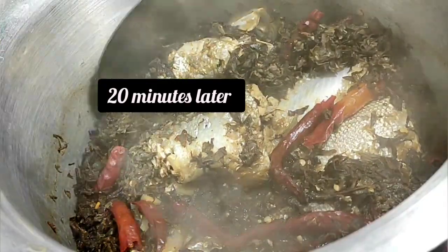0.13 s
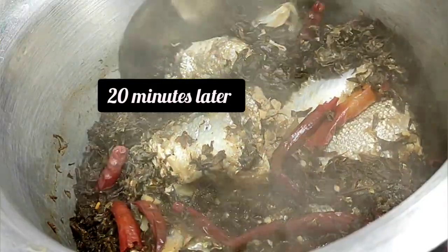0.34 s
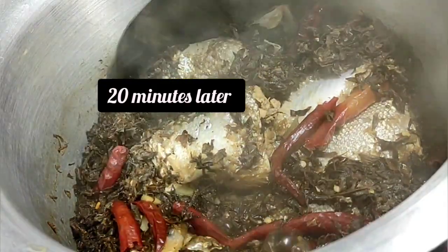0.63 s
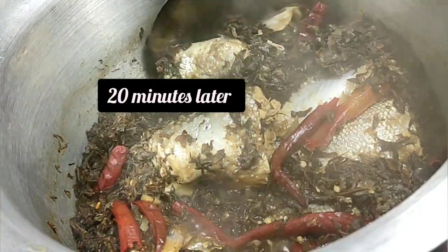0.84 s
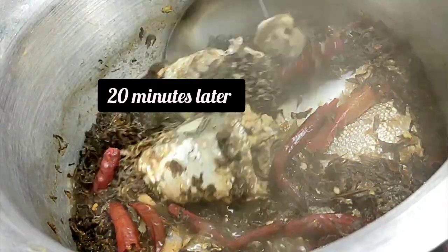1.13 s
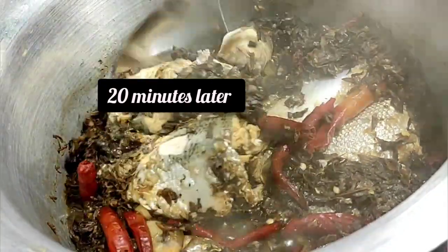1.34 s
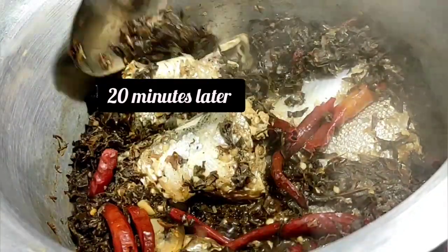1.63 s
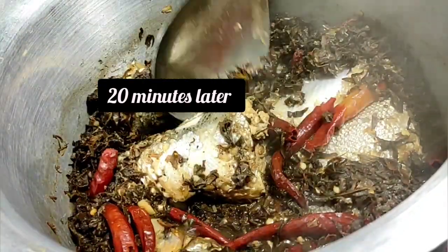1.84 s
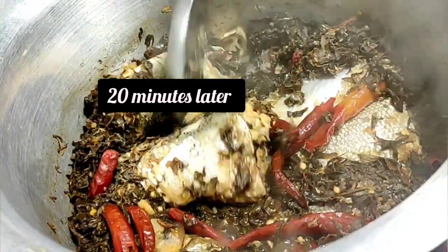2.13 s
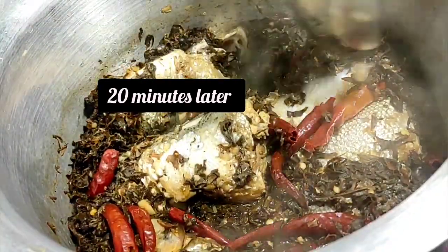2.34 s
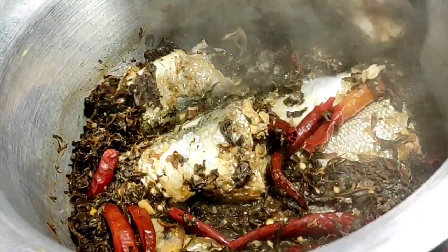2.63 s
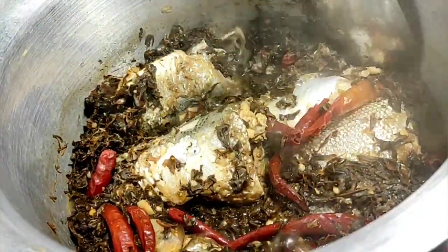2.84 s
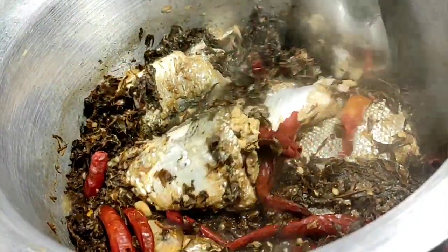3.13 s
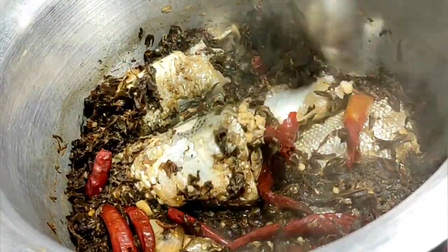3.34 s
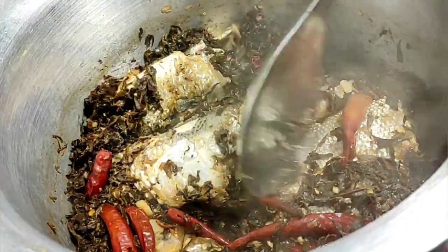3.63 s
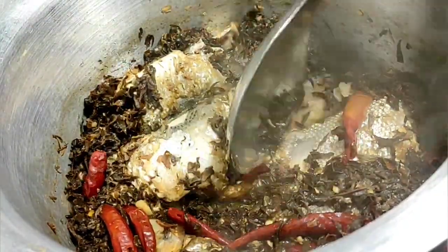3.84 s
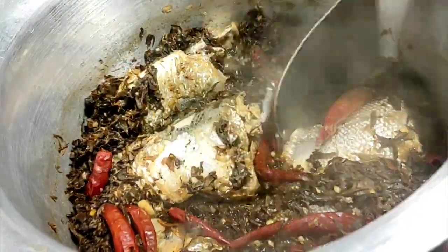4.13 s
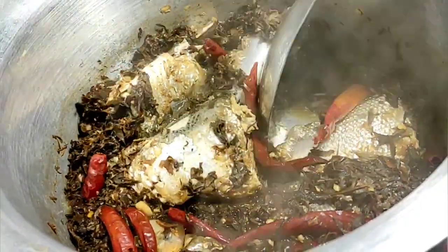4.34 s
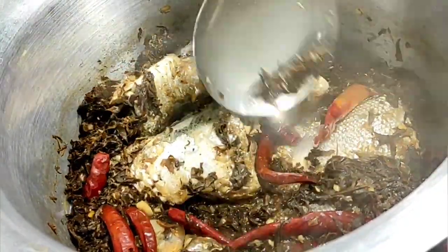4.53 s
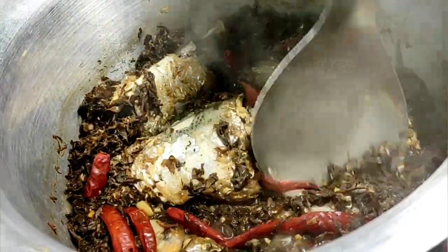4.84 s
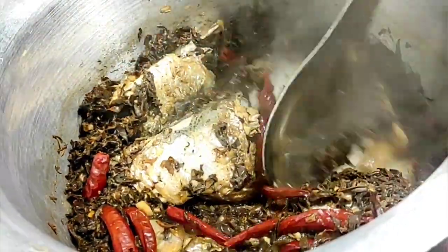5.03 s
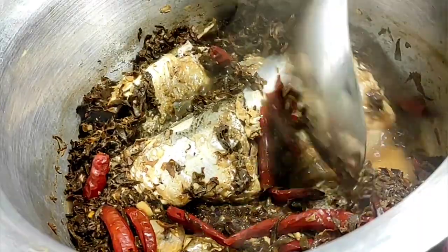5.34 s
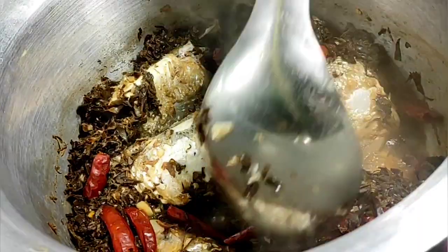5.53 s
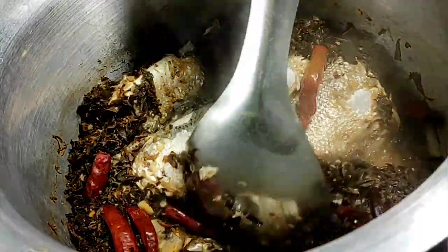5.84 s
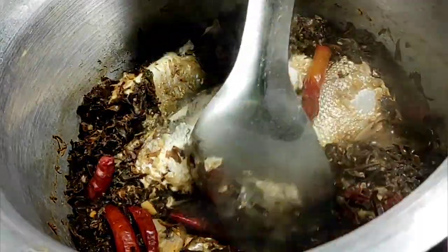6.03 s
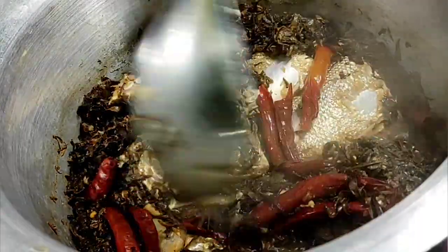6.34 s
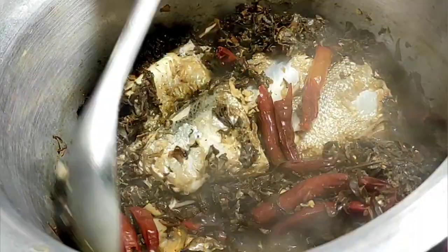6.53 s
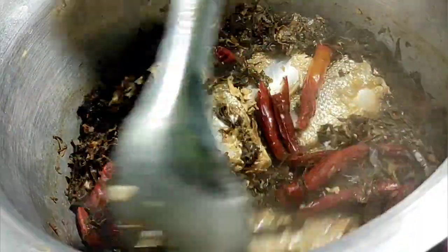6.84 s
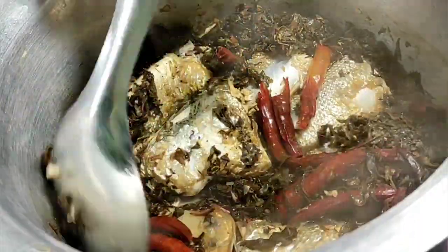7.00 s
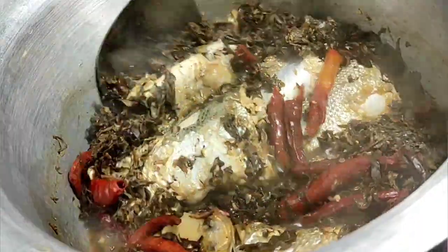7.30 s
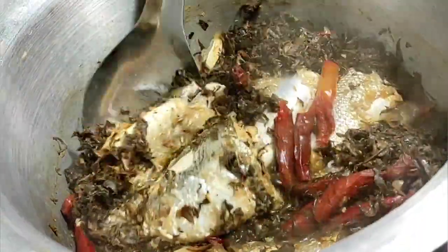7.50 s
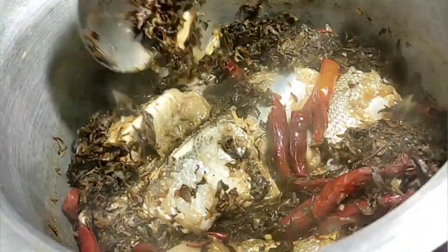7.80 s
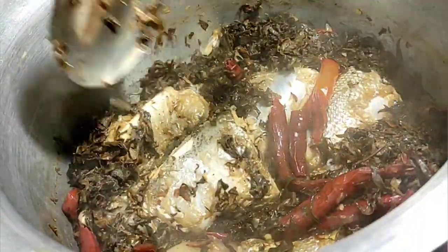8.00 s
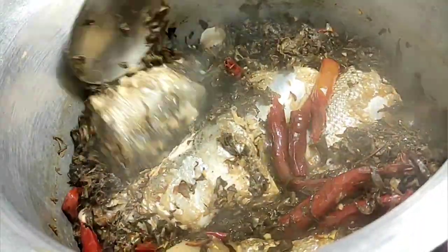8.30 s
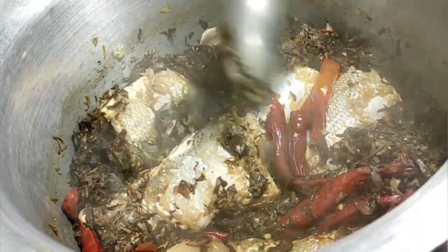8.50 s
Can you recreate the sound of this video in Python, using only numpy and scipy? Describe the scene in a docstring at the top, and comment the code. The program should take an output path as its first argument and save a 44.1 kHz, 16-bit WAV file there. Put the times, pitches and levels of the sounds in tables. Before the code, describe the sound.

A low bubbling wash and grainy sizzle run throughout, gently rising and falling, dotted with sharp spits and soft liquid plops. Over it a metal ladle works in a pot: short dull rubs, rasping scrapes and occasional metallic blows whose ring is quickly damped by food. The two clearest clangs ring for about half a second. Close stereo microphone, short hard kitchen reflections.

```python
"""A steel ladle strikes the wall of a thin metal pot, scrapes along it and turns as it rings.
Blows and scrapes excite sums of dying modes of the ladle and the wall, with noise for impact and friction.
Behind them a thick stew simmers as resonant noise, sizzles in bursts of tiny droplets and spits fat.
Two microphone ports, each with its own treble resonance, listen from close by in a small kitchen."""
import sys
import numpy as np
from scipy import signal
from scipy.fft import rfft, irfft
from scipy.io import wavfile
from scipy.ndimage import uniform_filter1d

SR = 44100
rng = np.random.default_rng(int(sys.argv[2]) if len(sys.argv) > 2 else 0)


def to_wav(sig):
    """Store sig (one row per channel, or 1-D mono) as 16-bit WAV at the path in sys.argv[1].

    Samples outside -1..1 are clipped; the rate is SR.
    """
    pcm = np.clip(np.atleast_2d(sig), -1, 1) * 32767
    pcm = np.round(pcm).astype(np.int16)
    wavfile.write(sys.argv[1], SR, pcm.T)  # frames by channels


N = 381906


def gain_of(db):
    """Level to amplitude: 20 dB is a factor of ten."""
    return 10 ** (np.asarray(db) / 20)


def evened(x):
    """Normalization to unit root-mean-square."""
    return x / np.sqrt(np.mean(x ** 2) + 1e-20)


def read(points, hz, order=1):
    """Interpolation of a table column along logarithmic frequency."""
    table = np.transpose(points)
    return np.interp(np.log(hz + 1), np.log(table[0] + 1), table[order])


def curve(rows, order):
    """Amplitude envelope: a dB column interpolated over time."""
    table = np.transpose(rows)
    return gain_of(np.interp(np.arange(N) / SR, table[0], table[order]))


def add(mix, s, sound):
    """Superposition: the sound joins the mix at time s."""
    part = mix[:, round(s * SR):][:, :sound.shape[1]]
    part += sound[:, :part.shape[1]]


# Decay of the room: (frequency [Hz], t60 [s])
KITCHEN_DECAY = [(100, 0.16), (500, 0.635), (2000, 0.387), (5000, 0.447), (10000, 0.12)]


def kitchen(x):
    """Reverberation: sparse echoes of random sign, each band decaying exponentially at its own rate."""
    taps = np.zeros((2, SR // 2))
    grid = np.arange(200, SR // 2 - 20, 20)
    at = grid + rng.integers(0, 20, (2, len(grid)))  # one echo in every 20 samples
    np.put_along_axis(taps, at, rng.choice([-1., 1.], at.shape), 1)
    hz, t, bands = signal.stft(taps, SR, nperseg=256)
    decay = gain_of(-60 * t / read(KITCHEN_DECAY, hz)[:, None])
    tail = signal.istft(bands * decay, SR, nperseg=256)[1]
    return signal.fftconvolve(x, tail / np.linalg.norm(tail[0]), axes=1)[:, :N]


# Relative treble colour of the ports: (frequency [Hz], left [dB], right [dB])
PORT_COLOUR = [(292, -25, -26), (1188, 0, 2), (1647, -15.5, -9), (2403, -18, -8), (3300, -13, -7.5),
               (4400, -10, -4), (5000, -13, -3.5), (6000, -11.5, -1.5), (6500, -10, 1), (7000, -7, 6.5),
               (7600, -4.5, 2), (8600, -1, -4), (9100, -7, -10), (9400, -14, -15), (9900, -24.5, -20.5),
               (14800, -29.5, -29), (15900, -37.5, -66.5)]


def ports(x):
    """Minimum-phase resonance: causal treble colour of each port; white noise keeps its level."""
    hz = abs(np.fft.fftfreq(2048, 1 / SR))
    colour_db = [read(PORT_COLOUR, hz, order=1), read(PORT_COLOUR, hz, order=2)]
    log_gain = np.log(gain_of(colour_db))
    taps = np.fft.ifft(np.exp(np.conj(signal.hilbert(log_gain)))).real[:, :1024]
    taps /= np.sqrt(np.sum(taps ** 2) / 2)
    return signal.oaconvolve(x, taps, axes=1)[:, :x.shape[1]]


# Where the pot wall radiates little: (lower edge [Hz], upper edge [Hz])
QUIET_BAND = [3200, 4200]


def walled(x):
    """Radiation efficiency: the band in which the wall is quiet is dimmed."""
    band = signal.butter(1, QUIET_BAND, "band", fs=SR, output="sos")
    return x - 0.675 * signal.sosfilt(band, x)


# Resonances of the air in the pot: (frequency [Hz], width [Hz], level of the added lift [dB])
AIR_RESONANCES = [(339.38, 19.3, 12.5), (455, 17.62, 27.5), (577.1, 29.8, 19)]
# Likeness of the two channels: (frequency [Hz], correlation [0-1])
LIKENESS = [(60, 0.63), (130, 1), (290, 0.925), (640, 0.647), (1400, 0.25), (3000, 0.01)]
# Balance of the channels: (frequency [Hz], left minus right [dB])
BALANCE = [(60, 2), (300, 2.5), (800, -1.5), (2000, 0.5)]


def stew(spectrum, patchy_db, flicker_db):
    """Cavity resonance: a low noise wash lifted where the air in the pot resonates; the bass is steadier."""
    frames, hz = N // 256 + 5, np.fft.rfftfreq(1024, 1 / SR)[:140]
    a, b, c, d, patches = rng.standard_normal((frames, len(hz), 5)).T
    flicker = evened(uniform_filter1d(patches[0], 3))  # all bands together
    patches = evened(uniform_filter1d(uniform_filter1d(patches, 5, 0), 5, 1))
    same = np.clip(read(LIKENESS, hz), -1, 1)[:, None]
    left = a + 1j * b
    right = same * left + np.sqrt(1 - same ** 2) * (c + 1j * d)
    bands = np.array([left, right])
    lift = 1 + sum(gain_of(db) / (1 + (2 * (hz - f) / width) ** 2) for f, width, db in AIR_RESONANCES)
    colour_db = np.outer([.5, -.5], read(BALANCE, hz)) + read(spectrum, hz)
    bands *= gain_of(colour_db)[:, :, None] * lift[:, None]
    unrest = (hz / (hz + 250))[:, None]
    bands *= gain_of((patchy_db * patches + flicker_db * flicker) * unrest)
    bands = np.pad(bands, ((0, 0), (0, 513 - len(hz)), (0, 0)))
    return evened(signal.istft(bands, nperseg=1024, noverlap=768)[1][:, :N])


# How hard the pot boils: (time [s], simmer level [dB], sizzle level [dB])
BOIL = [(0.0, -47.5, -46), (0.67, -47, -50.5), (0.96, -49, -48), (1.64, -48.5, -50), (2.99, -46.5, -49),
        (3.42, -47.5, -46.5), (3.81, -48.5, -50.5), (4.17, -45, -44), (4.53, -49.5, -50.5),
        (5.11, -48.5, -46), (5.52, -51.5, -50.5), (6.12, -48, -49), (6.42, -51.5, -51), (7.48, -45, -46.5),
        (7.79, -49, -51), (8.22, -50.5, -47.5), (8.44, -49, -48), (8.66, -51, -49.5)]
# Simmer before the air resonances: (frequency [Hz], relative density [dB per Hz])
SIMMER_SPECTRUM = [(15, -52), (25, -23.5), (64, -50), (87, -4.5), (252, 0.5), (294, -14), (331, -9),
                   (386, -15), (567, -10.5), (728, -4), (1800, -15), (2500, -14), (3250, -44), (5500, -120)]


def simmer():
    """Random superposition: many bursting bubbles merge into a low wash that follows the boil."""
    return curve(BOIL, order=1) * stew(SIMMER_SPECTRUM, patchy_db=1.83, flicker_db=3.5)


def fizz(per_s, spread_db, clump_db, hiss_db):
    """Shot noise: tiny droplets burst in clumps, each a few cycles long, over a smooth hiss."""
    slow = uniform_filter1d(uniform_filter1d(rng.standard_normal(N), 300), 300)
    clumps = gain_of(clump_db * evened(slow))
    size = gain_of(spread_db * np.minimum(rng.exponential(1, N), 5)) * (rng.random(N) < per_s / SR)
    kind, t, out = rng.integers(0, 10, N), np.arange(256) / SR, np.zeros((2, N))
    for k, (pitch, left, right) in enumerate(rng.random((10, 3))):
        hz = 1500 * 7.5 ** ((k + pitch) / 10)
        phase = np.array([[left], [right]])  # in cycles
        shape = np.exp(-t * hz / 3.5) * np.sin(2 * np.pi * (hz * t + phase))
        bursts = np.float32(size * (kind == k))[None]
        out += signal.oaconvolve(bursts, np.float32(shape * hz ** .5), axes=1)[:, :N]
    hiss = gain_of(hiss_db) * rng.standard_normal((2, N))
    return evened(ports(clumps * (evened(out) + hiss)))


def sizzle():
    """Random impulse excitation: droplets burst on hot metal at a level that follows the boil."""
    return curve(BOIL, order=2) * fizz(per_s=1500, spread_db=2.0, clump_db=2.0, hiss_db=2.5)


# Single spits, plops and ticks at set times, loud and soft:
# (time [s], relative spit level [dB], plop of the broth [dB])
TIMED_SPITS = [(0.2315, -30, -47), (0.3061, -29, -51), (0.3702, -32, -55), (0.5687, -32.5, -52.5),
               (0.8355, -31, -51.5), (0.922, -37, -57.5), (0.9477, -33.5, -56), (1.144, -31, -46),
               (1.1862, -45, -41), (1.222, -34.5, -46.5), (1.289, -43, -53), (1.305, -35, -55.5),
               (1.321, -39, -50.5), (1.3814, -38, -58), (1.457, -47.5, -59.5), (1.5542, -27.5, -40),
               (1.5884, -31.5, -54.5), (1.6456, -33, -38.5), (1.8139, -32, -50.5), (1.8932, -34, -51.5),
               (2.018, -41.5, -31.5), (2.0633, -29.5, -51), (2.1262, -29.5, -43), (2.2893, -42, -55.5),
               (2.5646, -26.5, -39.5), (2.6042, -30.5, -36.5), (2.7546, -32, -51), (2.9883, -35, -48),
               (3.1213, -32, -55), (3.3103, -37.5, -58), (3.548, -33, -32), (3.578, -37, -42.5),
               (3.6861, -36.5, -54.5), (3.888, -31.5, -41), (3.93, -33.5, -35.5), (4.2283, -24.5, -44.5),
               (4.9738, -53, -37), (4.9986, -37.5, -53.5), (5.0495, -36.5, -48), (5.1633, -34.5, -55),
               (5.1791, -50.5, -34.5), (5.397, -34, -56.5), (5.4615, -31.5, -40.5), (5.504, -36.5, -38),
               (5.607, -37, -44.5), (5.7571, -35.5, -44), (5.7658, -29.5, -49), (5.9255, -34, -56),
               (5.9809, -33.5, -54.5), (6.0622, -33.5, -59), (6.1046, -38, -56), (6.2568, -36.5, -58),
               (6.6269, -34, -55), (6.7696, -22.5, -51.5), (6.9761, -35.5, -52.5), (7.2245, -30, -57.5),
               (7.3663, -33, -55), (7.4665, -42, -55.5), (7.488, -29.5, -55.5), (7.533, -20, -41),
               (7.9719, -34, -38.5), (8.1739, -37, -54.5), (8.507, -43, -37.5), (8.56, -48.5, -38),
               (8.633, -49.5, -45)]
# Small spits at random times: number, least relative level, spread, plop against the spit
SMALL_SPITS, SMALL_DB, SMALL_SPREAD_DB, SMALL_PLOP_DB = 90, -47, 1.2, -13
RING_HZ, RING_SPREAD = 7424, 0.0256  # centre pitch of the faint high ring and its relative spread
PLOP_HZ, PLOP_S = 601, 0.0036  # median starting pitch and decay
TICK_S, PUFF_S, TAIL_S, TICK_SHARE, TAIL_SHARE = 0.00036, 0.00284, 0.024, .5, 0.18  # dying away


def spits():
    """Bubble acoustics: a tick and puff that ring faintly high in the ports, over a low plop that glides up."""
    out, low, t = np.zeros((2, N)), np.zeros((1, N)), np.arange(2000) / SR
    fall = np.exp(-t / PUFF_S) + TICK_SHARE * np.exp(-t / TICK_S) + TAIL_SHARE * np.exp(-t / TAIL_S)
    events = list(TIMED_SPITS)
    for when, size in rng.random((SMALL_SPITS, 2)):
        db = SMALL_DB - SMALL_SPREAD_DB * np.log(1 - size)
        events.append((when * N / SR, db, db + SMALL_PLOP_DB))
    for s, db, plop_db in events:
        (a, b), puff = rng.standard_normal(2), rng.standard_normal((2, 2000))
        ring_hz = RING_HZ * (1 + RING_SPREAD * a)
        high_ring = np.exp(-t / 0.004) * np.sin(2 * np.pi * ring_hz * t)
        add(out, s, gain_of(db) * fall * (0.4 * puff + 0.2 * high_ring))
        plop_hz = PLOP_HZ * np.exp(.25 * b)
        plop = np.sin(2 * np.pi * plop_hz * t * (1 + 10 * t)) * np.exp(-t / PLOP_S)
        add(low, s, gain_of(plop_db) * plop[None])
    return ports(out) + low


# Short-lived twins just under the strong ladle modes;
# each lags its partner by its own phase, so the pair beats while the twin lasts:
# (pitch [Hz], relative level [dB], t60 at full freedom [s], lobe angle before facing [rad],
#  lag behind the partner before any extra lag [rad])
TWIN_MODES = [(1204, 3.5, 0.205, -0.287, 0.71), (1900.1, 0.5, 0.125, -0.43, 2.864),
              (2366, -7, 0.193, 0.22, 0.39), (2715, -14, 0.233, 0.071, 0.7)]
SINK_DB_PER_S2, DIP_DB_PER_S, DIP_S = 216.5, 56.5, 0.193  # base rates at which food damps the ring; dip onset


def ring(pitches, modes, rough, free, hard_db, spot, facing, swing, lead=0, twin_db=None, favour=(), sink=1):
    """Modal superposition: dying modes each beam a lobe between the ports; lobes swing as the ladle turns."""
    hz, (db, t60, lobe) = np.array(pitches)[:, None], np.transpose(modes)[:, :, None]
    t = np.arange(round(SR * np.clip(.45 * free, .05, .5))) / SR
    db = db + hard_db * np.log2(np.maximum(hz, 1000) / 1500)
    db = db + 4.0 * np.cos(4.71 * np.log2(hz / 1500) + spot)  # the spot struck favours some modes
    twin_lag, *favour_db = favour or [0]
    db = db + np.pad(favour_db, (0, len(hz) - len(favour_db)))[:, None]
    contact = 1 + 0.2 * np.exp(-t / 0.0044)  # fast loss while steel still touches the wall
    upper = np.clip(hz / 1200 - 1, 0, 1.5)  # the upper modes sink more and more
    sinking_db = sink * SINK_DB_PER_S2 * t ** 2 * upper / max(free, .6) ** 3
    # a turning ladle dips into the food
    sinking_db = sinking_db + DIP_DB_PER_S * np.max(np.abs(swing)) * np.maximum(t - DIP_S, 0)
    gap, start, phase = rng.random((3, len(hz), 1))
    beat = np.cos(2 * np.pi * ((15 + 50 * gap) * t + start) + 2 * np.sin(2 * np.pi * 23 * t))
    throb = rough * beat * np.exp(2j * np.pi * gap)  # close neighbours
    fall = gain_of(db - 60 * t / (t60 * free) - sinking_db)
    waves = contact * fall * np.exp(2j * np.pi * (hz * t + phase)) * (1 + throb)
    turn = 1 - np.exp(-t / 0.18)  # the turn slows down
    angle = lobe + facing + np.reshape(swing, (-1, 1)) * turn
    rise = 1 - np.exp(-t * hz / 1.55)  # a mode takes a few cycles to speak
    right = waves * np.exp(1j * np.reshape(lead, (-1, 1)))
    out = (np.array([np.cos(angle) * waves.imag, np.sin(angle) * right.imag]) * rise).sum(1)
    if twin_db is not None:
        near = slice(1, len(TWIN_MODES) + 1)  # the partners of the twins
        low_hz, low_db, low_t60, low_lobe, lag = np.transpose(TWIN_MODES)[:, :, None]
        low_fall = gain_of(low_db + twin_db - 60 * t / (low_t60 * free))
        twins = low_fall * np.sin(2 * np.pi * (low_hz * t + phase[near]) - lag - twin_lag)
        beam = np.array([np.cos(low_lobe + facing), np.sin(low_lobe + facing)])
        out += (beam * twins * rise[near]).sum(1)
    return out * np.minimum((t[-1] - t) / .02, 1)


# Strokes of the ladle along the wall: (start [s], time to press on [s], time from start to lift [s],
#  relative rumble [dB], relative rasp [dB], groan pitch [Hz], groan level before the envelope [dB])
STROKES = [(0.205, 0.0205, 0.0272, -47.5, -40.5, 450, -57.5),
           (0.954, 0.0515, 0.1427, -41, -39.5, 342.8, -41), (1.992, 0.0164, 0.072, -59, -47.5, 450, -62),
           (2.975, 0.022, 0.046, -48, -39, 454, -62.5), (4.826, 0.0385, 0.098, -48, -50.5, 571, -52.5),
           (5.035, 0.03, 0.285, -54.5, -48.5, 567, -59.5), (6.176, 0.017, 0.0384, -48, -47.5, 450, -64),
           (6.702, 0.0152, 0.0803, -36, -33.5, 471, -42), (7.093, 0.0343, 0.0945, -60, -45.5, 344, -64)]
SAG_DB_PER_S, LIFT_DB_PER_S = 44, 270  # a stroke weakens while it lasts; then the ladle lifts away as well
GROAN_WIDTH = 0.083  # bandwidth against pitch
SLIPS_PER_S, SLIP_S, SLIP_DEPTH = 350, .0035, .3  # the edge sticks and slips unevenly


def strokes():
    """Stick-slip friction: slips break up the rumble and rasp gains; the wall groans low under each stroke."""
    out, groan, t = np.zeros((2, N)), np.zeros((1, N)), np.arange(SR // 2) / SR
    noises = rng.standard_normal((len(STROKES), SR // 2))
    for (s, press, length, *db, hz, groan_db), noise in zip(STROKES, noises):
        fall_db = SAG_DB_PER_S * np.maximum(t - press, 0) + LIFT_DB_PER_S * np.maximum(t - length, 0)
        shape = np.minimum(t / press, 1) ** 2 * gain_of(-fall_db)
        add(out, s, np.outer(gain_of(db), shape))
        edges = [hz * (1 - GROAN_WIDTH / 2), hz * (1 + GROAN_WIDTH / 2)]
        band = signal.butter(1, edges, "band", fs=SR, output="sos")
        add(groan, s, gain_of(groan_db) * shape * evened(signal.sosfilt(band, noise))[None])
    jolts = rng.exponential(1, N) * (rng.random(N) < SLIPS_PER_S / SR)
    slips = signal.lfilter([1], [1, -np.exp(-1 / (SLIP_S * SR))], jolts)
    rumble, rasp = out * evened(1 - SLIP_DEPTH + SLIP_DEPTH * evened(slips))
    return rumble, rasp, groan


# Rumble of dragged food before the air resonances: (frequency [Hz], relative density [dB per Hz])
RUB_SPECTRUM = [(60, -54.5), (200, -2), (350, 0.5), (600, -2.5), (1100, 10), (1600, 2.5), (2600, -9),
                (5000, -58.5)]


def scrapes():
    """Friction excitation: dragged food gives a lumpy rumble, a grainy rasp and the muffled ring of the steel."""
    rumble, rasp, groan = strokes()
    slips = rng.standard_normal(N) ** 2 * (rng.random(N) < 900 / SR)
    muffled = ring(LADLE_PITCHES + POT_PITCHES, LADLE_MODES + POT_MODES, rough=0.9, free=0.3,
                   hard_db=6.0, spot=0.5, facing=0.5, swing=0)
    steel = signal.oaconvolve(slips[None], muffled, axes=1)[:, :N]
    grit = fizz(per_s=2500, spread_db=3, clump_db=3, hiss_db=2) + .7 * evened(steel)
    wash = stew(RUB_SPECTRUM, patchy_db=3.0, flicker_db=3.0)
    return rumble * wash + groan + rasp * evened(walled(grit))


# Mode pitches of the ladle: (frequency [Hz])
LADLE_PITCHES = [455, 1215, 1916, 2396, 2808, 3298, 3910, 4490, 4657, 5505, 6457, 6589, 6928, 7068, 7250,
                 7490, 7698, 8425, 8520, 8630, 8742, 8974, 9870, 11230, 11660, 12600, 14100]
# Ring of the ladle at those pitches: (relative level [dB], t60 at full freedom [s], lobe angle before facing [rad])
LADLE_MODES = [(-14, 0.455, 0.714), (-4, 0.97, -0.39), (1.5, 0.695, -0.526), (-1.5, 0.64, 0.23),
               (-7, 0.81, 0.664), (-15, 0.44, -0.86), (-19.5, 0.51, 0.91), (-34, 0.21, .8),
               (-13.5, 0.23, 0.86), (-17, 0.143, 0.9), (-33.5, .35, 1), (-17.5, .2, .9),
               (-16.5, 0.197, 1.84), (-5.5, 0.18, 0.89), (-9, 0.15, 1.73), (-15, 0.244, 1.4),
               (-7, 0.177, 1.3), (-26.5, 0.073, .4), (-13, 0.14, 0.42), (-10, 0.092, -0.094),
               (-16, 0.256, 0.15), (-28, .19, 0.38), (-31, 0.168, .8), (-67.5, .2, .8), (-57, .2, .8),
               (-43.5, .25, .8), (-40.5, .25, 0.94)]
# Swing of each ladle lobe for a turn factor of one: (angle [rad])
LADLE_SWING = [0.085, -0.757, 0.322, 0.24, -0.023] + [0] * 22
# Lead of the right port in each ladle mode: (phase [rad])
LADLE_PHASE = [0.93, 0.833, 0.686, 0.0, 1.96, 0.3, 1.4] + [0] * 20
# Mode pitches of the pot wall: (frequency [Hz])
POT_PITCHES = [335, 560, 1905, 2190, 2386, 2540, 2695, 2824, 2965, 3120, 3304, 4510, 4791, 4892, 5050, 5313,
               5860, 5945, 6600, 7325, 7650, 7760, 8387, 8468, 8624, 8911, 9006, 9750]
# Ring of the wall at those pitches: (relative level [dB], t60 at full freedom [s], lobe angle before facing [rad])
POT_MODES = [(-13.5, 0.404, 0.21), (-31, 0.66, 0.59), (-10.5, 0.37, 0.89), (-21.5, 0.45, 0.5),
             (-4, 0.32, 0.295), (-17, 0.37, 0.81), (-14, 0.45, 0.4), (-10, 0.544, 0.34),
             (-17.5, 0.46, 0.51), (-18, 0.49, 0.2), (-19.5, 0.525, 0.18), (-17, 0.49, 0.5),
             (-17, 0.52, 0.567), (-16.5, 0.55, 0.6), (-13, 0.65, 0.38), (-18.5, 0.45, 0.35),
             (-10, 0.58, 0.76), (-3, 0.363, 0.97), (-15, 0.42, 0.71), (-15, 0.52, 0.66),
             (-15.5, 0.55, 0.65), (-13, 0.47, 0.88), (-16, 0.266, 0.08), (-20.5, 0.4, 0.285),
             (-19.5, 0.48, 0.099), (-23.5, 0.36, 0.27), (-22, 0.44, 0.4), (-20.5, 0.187, 0.088)]
# Lead of the right port in each wall mode: (phase [rad])
POT_PHASE = [0.3, 0.6, -1.1, -0.8, 1.0, 2.8, 2.3, 1.1, 1.0, 1.1, 1.5, 0.5, -1.0, -1.3, -2.8, -0.6, -1.8,
             -2.0, -1.5, -1.8, 1.5, 2.5, 0.1, -2.8, 2.2, -0.1, 2.8, -3.0]
# Blows of the ladle, levels relative: (time [s], crack [dB], crack left minus right [dB], top of the crack [dB],
#  thud [dB], ladle [dB], pot [dB], twins [dB], freedom to ring [0-1], hardness [dB per octave],
#  spot struck [rad], facing [rad], turn [factor on the ladle swing])
STRIKES = [(0.1242, -26.5, -5, 4, -51.5, -55.5, -59, -11.5, 0.6, 10.5, 1, 0.083, 0.1),
           (0.7464, -27.5, -13.5, -13, -63, -34.5, -34.5, 4, 0.45, -1, -0.067, 0.062, 0.1),
           (0.7946, -42.5, -4, -7, -64, -46, -40, 4.5, 0.36, -5.5, 0.17, 0.128, 0.1),
           (3.0121, -24, -3.5, 3.5, -60, -30, -33, 0, 0.07, -12, 1, 0.8, 0.1),
           (3.356, -10, 4, 4, -70.5, -18, -54.5, 3, 0.77, 3.5, 0.04, 0.016, 4.74),
           (3.3607, -14, 4, 1, -60.5, -42.5, -36, -7, 0.13, 7.5, 0.1, 0.23, 0.1),
           (3.379, -23, -9, -3, -49, -38.5, -32, -7, 0.03, 9, 0.1, 0.23, 0.1),
           (4.0673, -6.5, 3.5, 4.5, -35.5, -28, -10, 0, 0.32, 1, 0.47, 0.165, 0.1),
           (6.702, -21.5, -6.5, -11, -48, -29, -44, -9.5, 0.08, -15, -0.63, 0.74, 0.08),
           (7.347, -50, -1, 1.5, -57.5, -45, -27.5, -9, 0.06, -6, 0.87, 0.52, .1),
           (7.5268, -21, -1.5, 2.5, -50, -49.5, -53.5, -11.5, 0.35, 11, 1, 0.059, 0.1),
           (7.622, -43.5, -13, -4.5, -69.5, -45.5, -67, -14, 1, -12.5, 1, 0.88, 0.092),
           (8.28, -31, -3, 0.5, -48.5, -48.5, -39.5, -8, 0.43, -20, 0.38, 0.12, 0.1),
           (8.3492, -9.5, 4.5, -21.5, -51.5, -14, -42, -0.5, 0.78, -0.2, 0.49, 0.007, 0.104),
           (8.3539, -17.5, -0.5, -16, -55.5, -45, -33, -8.5, 0.08, 5.5, 0.14, 0.2, 0.1),
           (8.3625, -26, -0.5, -14.5, -47.5, -45.5, -33, -9, 0.01, -1, 0.14, 0.2, 0.1),
           (8.6265, -33.5, -8.5, -9, -51.5, -57, -61.5, -9, 0.01, -14, 0.14, 0.103, 0.1)]
# Freely ringing blows favour the ten lowest ladle modes differently:
# (time [s], extra lag of the twins [rad], then ten mode gains [dB])
FREE_CLANGS = [(0.7466, 0.097, 0.1, 1.94, -5.5, 0.97, 1, 1, 1, 1, 1, 3),
               (3.3561, 0.084, 4.1, -1.5, 1.5, 0.1, 2.05, 1.7, 2.5, 2, 1.42, 10.5),
               (8.3493, 0.77, 0.1, 0.54, 1, 1, 5.16, 0.1, 3.95, 1.8, 5.16, -12)]
POT_SINK = 0.27  # the wall is damped less than the ladle


def blows():
    """Impact excitation: a brief crack and a rough thud of the jolted pot, then ladle and wall ring."""
    cracks, rings, t = np.zeros((2, N)), np.zeros((2, N)), np.arange(9000) / SR
    fall = np.minimum(t / 0.0012, 1) * (np.exp(-t / 0.003706) + 0.0584 * np.exp(-t / 0.061))
    top = np.clip(np.fft.rfftfreq(9000, 1 / SR) / 2000 - 4.5, 0, 1)  # above 9 kHz
    crowding = 0.315 + 0.5 * np.log2(np.array(LADLE_PITCHES)[:, None] / 3000)
    rough = np.clip(crowding, 0.14, 0.9)  # the upper modes crowd
    for row, noise in zip(STRIKES, rng.standard_normal((len(STRIKES), 2, 9000))):
        s, crack_db, lean_db, top_db, thud_db, ladle_db, pot_db, twin_db, *strike, turning = row
        crack = irfft(rfft(noise) * gain_of(top_db * top))
        sides = gain_of([[crack_db + lean_db / 2], [crack_db - lean_db / 2]])
        add(cracks, s, sides * fall * crack)
        deep, knock = (evened(signal.sosfilt(signal.butter(2, band_hz, "band", fs=SR, output="sos"), noise[0]))
                       for band_hz in ([95, 184], [180, 573]))
        boom = (1 - np.exp(-t / 0.0179)) * np.exp(-t / 0.0593)  # the stove answers late
        thud = 0.944 * deep * boom + 3.84 * knock * np.exp(-t / 0.00846)
        add(rings, s, gain_of([[thud_db + 0.21], [thud_db - .6]]) * thud)
        favour = next((clang[1:] for clang in FREE_CLANGS if abs(clang[0] - s) < .0025), ())
        swing = turning * np.array(LADLE_SWING)
        ladle = ring(LADLE_PITCHES, LADLE_MODES, rough, *strike, swing, LADLE_PHASE, twin_db, favour)
        add(rings, s, gain_of(ladle_db) * ladle)
        wall = ring(POT_PITCHES, POT_MODES, 1.0, *strike, 0, POT_PHASE, sink=POT_SINK)
        add(rings, s, gain_of(pot_db) * wall)
    # the crack has no bass
    cracks = signal.sosfilt(signal.butter(2, 1300, "high", fs=SR, output="sos"), cracks)
    return ports(walled(cracks)) + rings


def scene():
    """Linear superposition: stew and ladle add up; only blows and spits excite the reverberation."""
    bass_cut = signal.butter(4, 85, "high", fs=SR, output="sos")  # blows and spits carry no deep bass
    sharp = signal.sosfilt(bass_cut, blows() + spits())
    return simmer() + sizzle() + scrapes() + sharp + gain_of(-16) * kitchen(sharp)


EDGE_HZ = 16000  # upper band limit


def record(dry):
    """Saturation and band limitation: peaks beyond full scale are clipped, then the top is filtered away."""
    taps = signal.firwin(511, EDGE_HZ, window=("kaiser", 9), fs=SR)[None]
    return signal.oaconvolve(np.clip(dry, -1, 1), taps, "same", axes=1)


dry = scene()
out = record(dry)
to_wav(out)
```